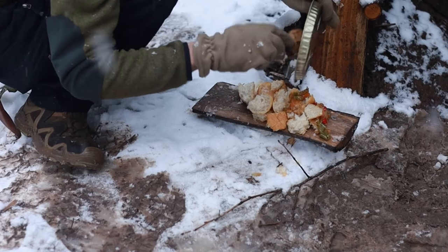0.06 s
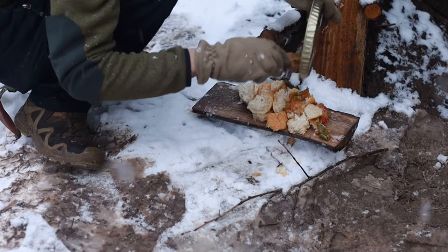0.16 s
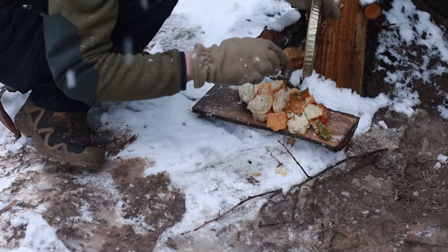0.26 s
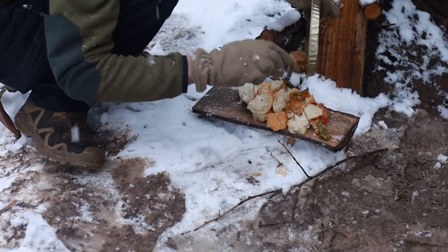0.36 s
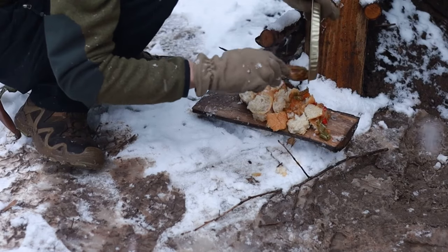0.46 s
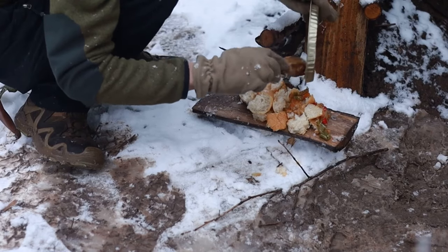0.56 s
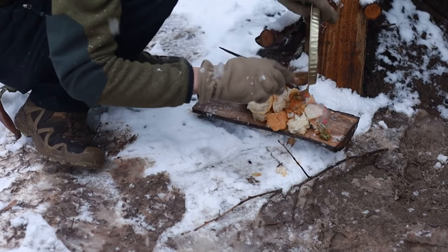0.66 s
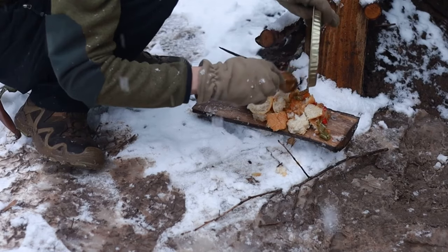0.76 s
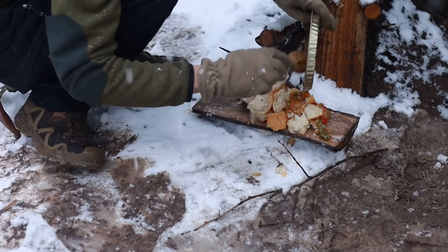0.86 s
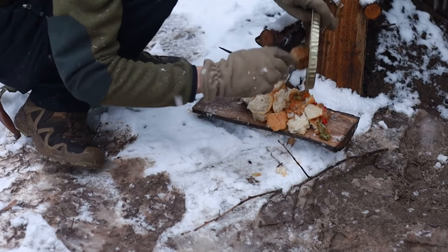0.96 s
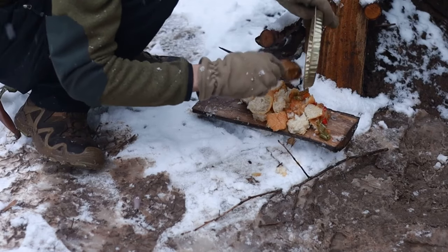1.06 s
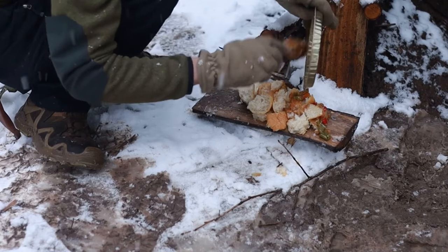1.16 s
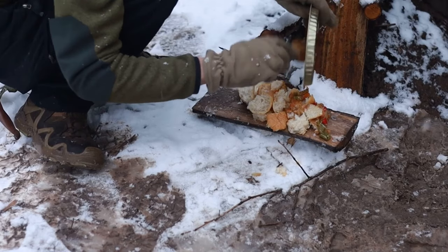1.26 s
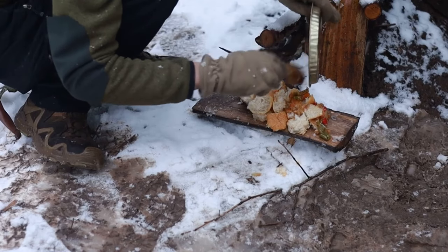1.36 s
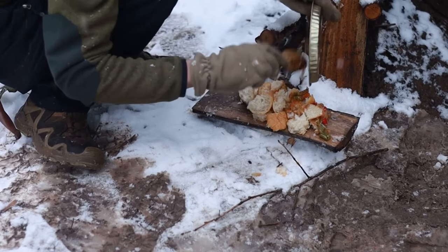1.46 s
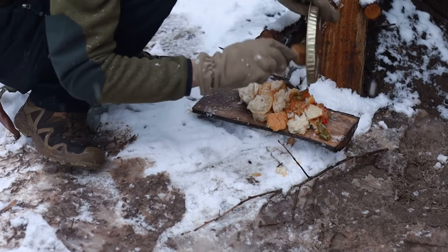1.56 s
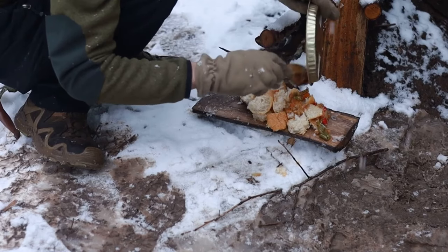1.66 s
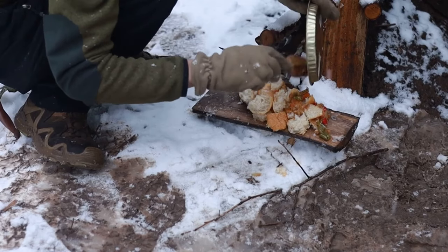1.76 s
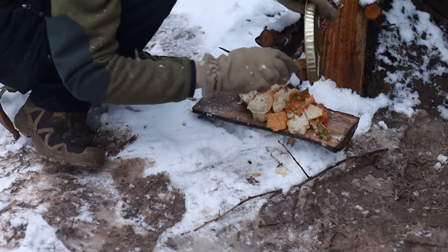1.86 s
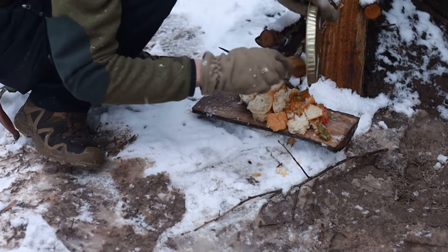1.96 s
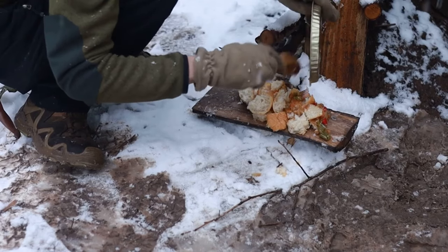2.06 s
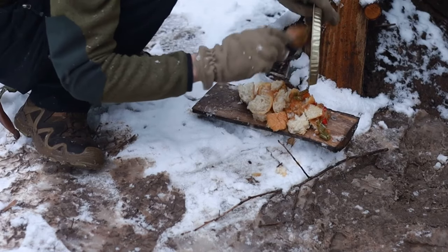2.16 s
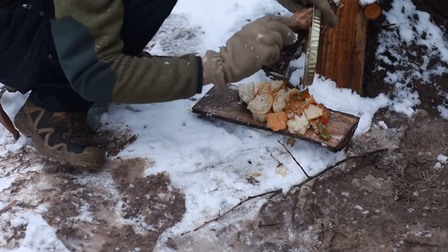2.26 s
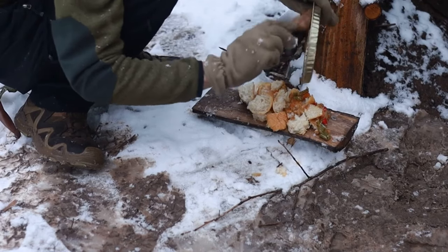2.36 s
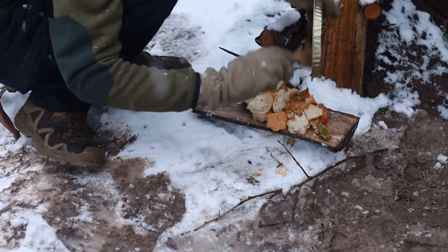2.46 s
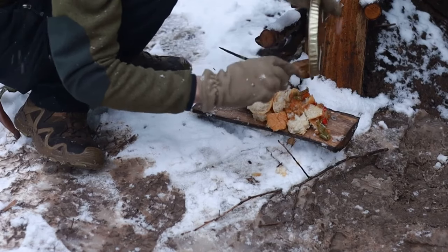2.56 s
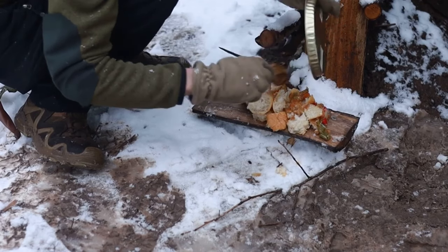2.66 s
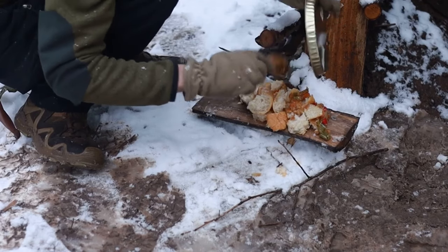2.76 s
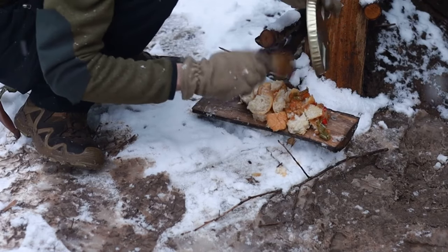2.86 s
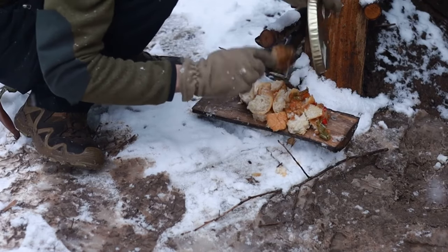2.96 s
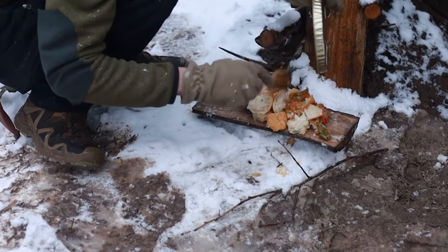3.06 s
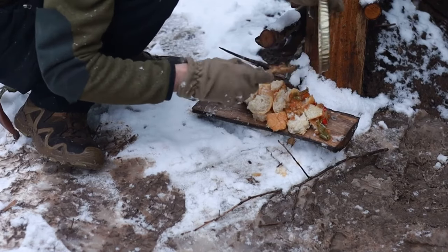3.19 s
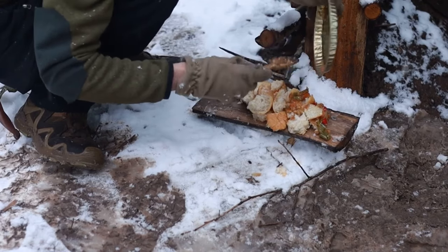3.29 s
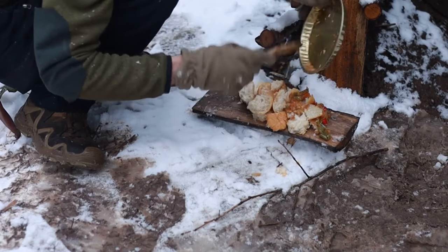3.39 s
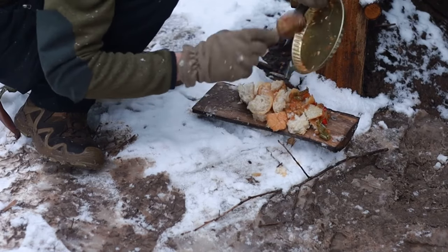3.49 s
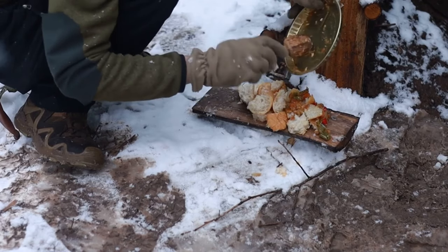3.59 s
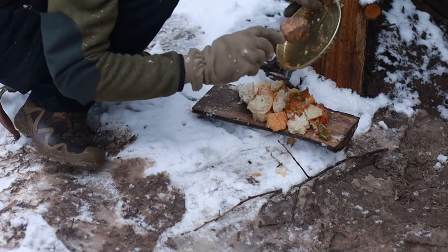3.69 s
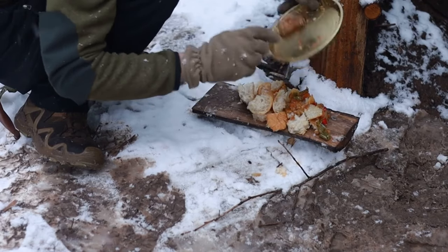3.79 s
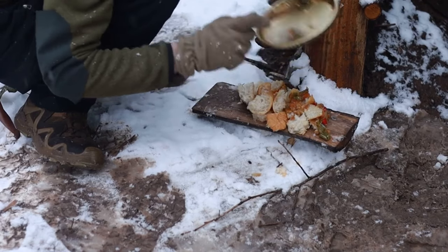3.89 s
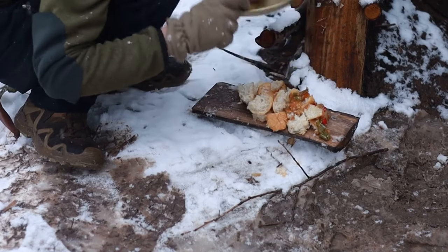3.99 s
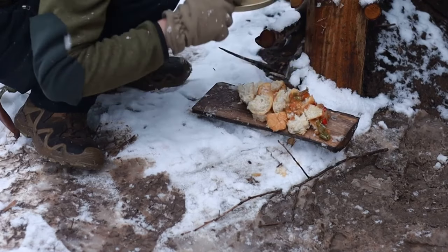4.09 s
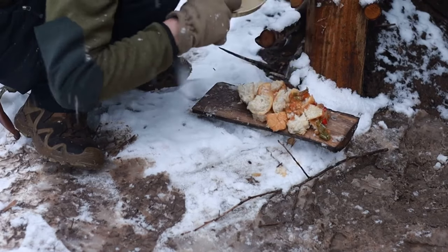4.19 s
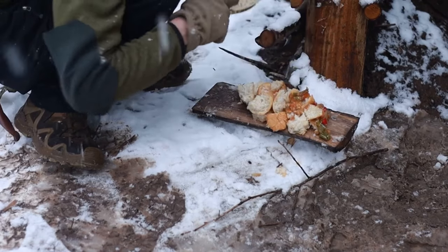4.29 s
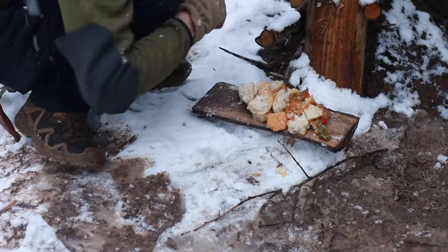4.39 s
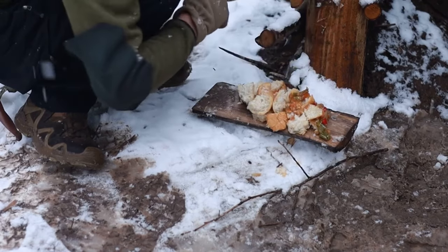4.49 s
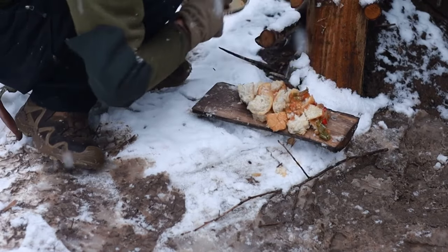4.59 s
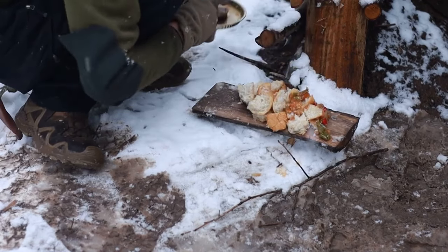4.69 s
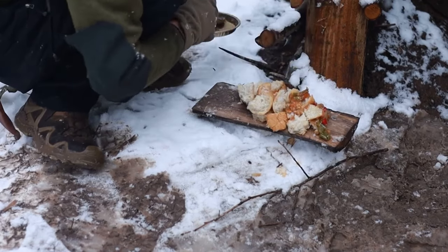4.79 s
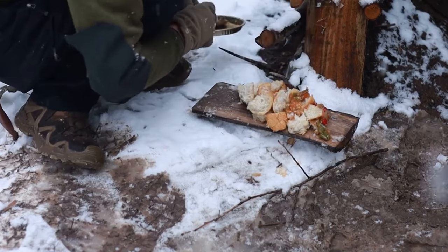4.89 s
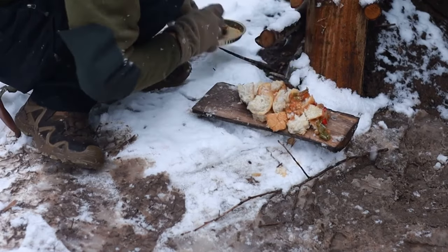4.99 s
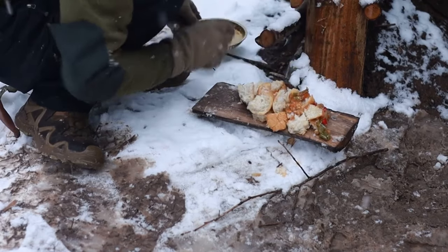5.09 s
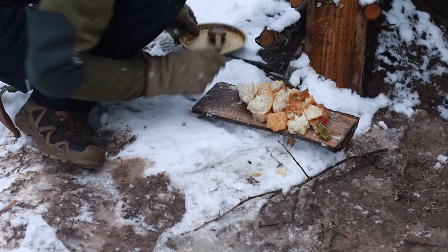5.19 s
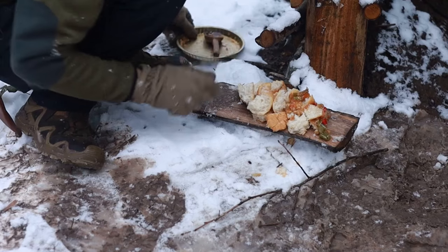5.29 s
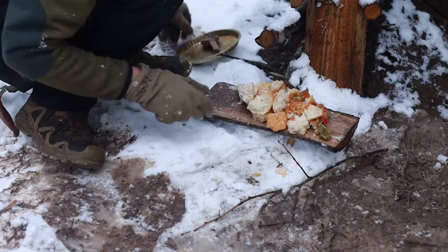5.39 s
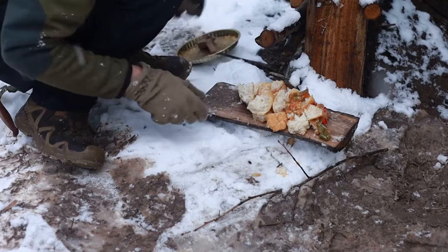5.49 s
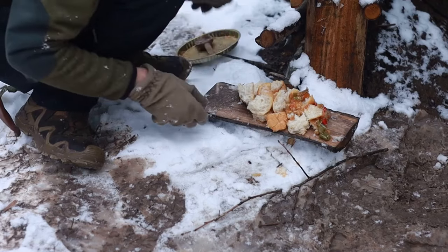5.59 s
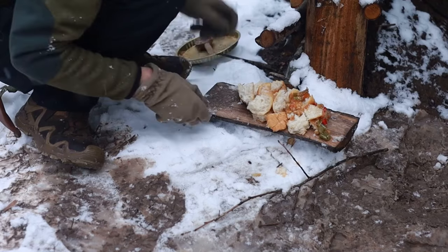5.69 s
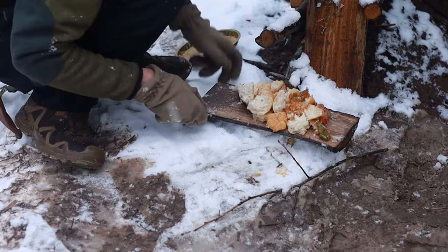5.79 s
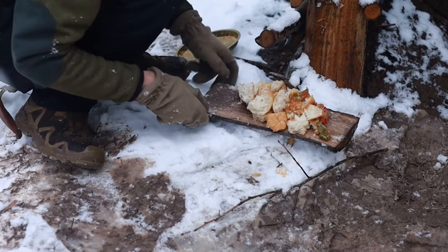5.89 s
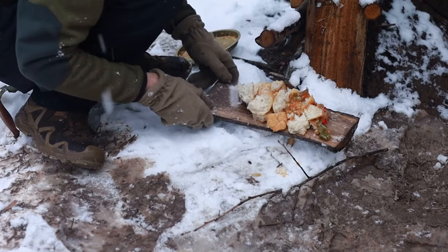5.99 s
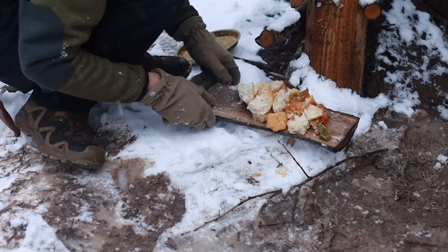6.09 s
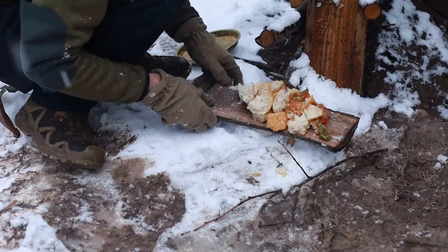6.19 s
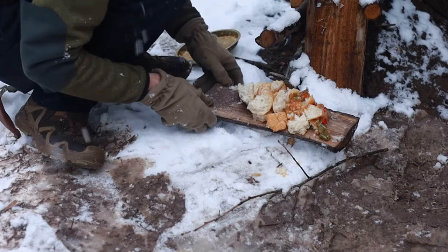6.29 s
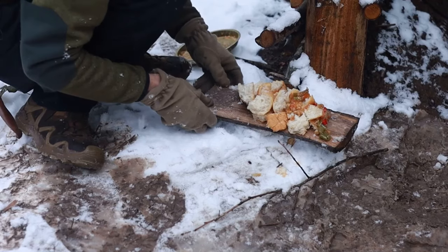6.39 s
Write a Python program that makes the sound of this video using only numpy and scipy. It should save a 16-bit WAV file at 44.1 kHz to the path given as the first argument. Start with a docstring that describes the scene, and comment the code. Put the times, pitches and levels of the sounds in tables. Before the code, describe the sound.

A very quiet outdoor place, close stereo microphone, no echo, only a faint steady hush of air. From 0.3 s a knife taps a thin metal plate slightly right of centre: short, dry clinks with brief ringing, at uneven gaps. Between 1.0 and 2.1 s taps mix with gritty little scrapes, stronger near 1.15, 1.45 and 1.7 s, with tiny squeaks at 1.16 and 1.72 s. A soft sleeve swish passes at 2.3 s, then light ticks and a faint scrape at 2.6-2.75 s and a muted touch at 3.1 s. At 3.73 s comes by far the loudest event, a hard hollow clank with a wooden knock, bouncing more softly at 3.88 s with a short squeak. Small clinks follow at 4.15 and 4.8 s, with fleece rustles from 4.0 to 5.4 s, and faint dull bumps at 4.6, 5.7 and 6.4 s.

```python
"""Knife scraping a metal plate outdoors

A knife taps and scrapes food scraps off a gloved, hand-held plate in still, snowy air; later it clatters and
bounces. Each contact is a short slip driving decaying plate modes, shared among five registers; a few contacts
squeak. Blunt knocks, mostly wood, are short sines with noise puffs; sleeves and the faint hush are coloured
stereo noise."""
import sys
import numpy as np
from scipy import signal
from scipy.fft import rfft, irfft, next_fast_len
from scipy.io import wavfile
from scipy.ndimage import uniform_filter1d, map_coordinates

SR = 44100
rng = np.random.default_rng(int(sys.argv[2]) if len(sys.argv) > 2 else 0)


def wav_out(sig):
    """Save sig, one row per channel (or a flat mono array), as 16-bit PCM at SR to the path in sys.argv[1]."""
    wavfile.write(sys.argv[1], SR, np.round(np.clip(np.atleast_2d(sig).T, -1, 1) * 32767).astype(np.int16))


N = 284445

# knife on plate, and at 2.584 s a soft, low scrape of food falling onto it: t/s, slip/s, nominal strength/dB,
# hardness/dB (about 0 bare steel, below -10 cushioned by food), favoured f/Hz at the contact point, place (0
# near the rim, 1 middle)
CONTACTS = [(.3048, .003, -44.5, -1, 1000, 0.2), (.3946, 0.0033, -59, -12, 685, 0),
            (.543, 0.0017, -50, 2.5, 1050, 0.18), (.61, .0057, -61.5, -2, 1140, 0),
            (.7637, 0.0087, -64.5, -6, 1700, 0.056), (.8092, 0.0033, -49, 1.5, 2220, 0.036),
            (1.0393, 0.028, -61, -7, 392, 0.51), (1.1578, 0.0015, -44, 5, 2220, 0.27),
            (1.382, .017, -57, -7, 704, 0.41), (1.4645, 0.0063, -42, -5.5, 776, 0.12),
            (1.7095, 0.0017, -56.5, -18, 350, 0.64), (1.716, .0064, -53, 0, 2370, 0),
            (1.727, 0.021, -44, -22, 1710, 0.4), (1.775, 0.0019, -45.5, 1, 2250, 0),
            (1.9732, 0.014, -56, -4.5, 523, 0.25), (2.038, 0.03, -60, -1.5, 2420, 0.032),
            (2.0677, 0.026, -61, 0, 2460, 0), (2.584, 0.029, -67.5, -3, 220, 0.65),
            (2.671, .002, -47.5, -2, 2470, .1), (2.6815, 0.0012, -53.5, -4, 930, 0.47),
            (2.7385, .003, -62, -5.5, 1020, 0), (2.7495, .003, -66, -3, 1100, .2),
            (3.075, .0017, -62, -12, 620, 0.097), (3.7301, 0.0059, -32.5, -2.5, 1100, 1),
            (3.7379, 0.012, -32, -1.5, 1860, 0.15), (3.877, 0.0066, -44, 2.5, 970, 1),
            (3.8845, 0.0029, -43.5, -6.5, 940, 0.64), (4.1413, 0.0025, -51.5, -12.5, 1360, 0.39),
            (4.227, 0.014, -64, -22, 540, 0.47), (4.7998, 0.00029, -44.5, -4.5, 1970, 0),
            (5.566, 0.0037, -79.5, 16, 5800, 0)]
# edge sticking and slipping on one plate mode: t/s, length/s, level/dB
SQUEAKS = [(1.164, 0.01, -36), (1.722, 0.011, -35.5), (3.895, 0.024, -37)]
# clear plate modes: f/Hz, relative level struck near the rim/dB, in the middle/dB, t60/s
PLATE_MODES = [(179.3, -3.5, -7.5, 0.17), (456.5, -8, -11.5, 0.28), (548, -21, -8, 0.32),
               (650, -18.5, -5, 0.3), (779.6, 3.5, -7, 0.065), (855, -9.5, -5.5, .22), (949, -9, 2, 0.077),
               (1085, -9, -4.5, 0.17), (1128, 0.5, -4, 0.07), (1360, -24, -15, 0.22),
               (1574, -20, -19, 0.13), (1690, -3.5, 6.5, 0.14), (2080, -6.5, -1, 0.11),
               (2285, 2, -4, 0.069), (2324, -3, -15, 0.14), (2401, 3.5, -3, 0.063), (2520, -7.5, -5, 0.039),
               (2670, 4.5, -15, 0.049), (3380, -29, -4, 0.15), (3570, 11.5, -7, 0.023),
               (4750, -4, -10, 0.055), (4970, -18, 6, 0.082), (5870, -28, 3, 0.081), (7020, 3, -3, 0.05),
               (6800, -14, -14, 0.076)]
# weak, overlapping plate modes: f/Hz, t60/s
CROWD_T60 = [(200, 0.29), (900, 0.2), (2200, 0.16), (4000, 0.1), (7000, .11), (14000, 0.094)]
# plate radiation: f/Hz, gain/dB
RADIATION = [(40, -19), (130, -26), (200, 4.5), (320, -1), (500, -2.5), (1050, 9.5), (1950, 7), (2550, 8),
             (2950, -0.5), (3650, 2), (4700, -1), (6300, -0.5), (8500, -9), (16000, -19)]
# difference between the two microphones on the plate: f/Hz, side gain/dB
PLATE_WIDTH = [(100, -19), (380, -17), (700, -15), (1300, -10.5), (2400, -10), (4400, -7), (8000, -15.5),
               (15000, -15)]
# contact registers thud, body, ring, crack, tick: low f/Hz, high f/Hz
REGISTERS = [(30, 620), (620, 1400), (1400, 2900), (2900, 8500), (8500, 18000)]
# firm tap of bare steel near the rim: level relative to FIRM_DB/dB, one per register
FIRM_TAP_DB = [-10, -0.85, .7, -0.5, -14]
# growth with strength, least in the thud: dB per dB, one per register
FORCE_GROWTH = [0.39, 0.89, 1.14, 1.19, 0.91]
# growth with hardness, mainly in the treble: dB per dB, one per register
HARDNESS_GROWTH = [0, 0.11, 0, 0.75, 1.4]
# change from rim to middle, where the plate booms: level/dB, one per register
MIDDLE_DB = [8, 5.5, -5, -1, 1.5]
# blunt low knocks and thumps, mostly of the wooden handle and the board, one perhaps a knee or boot in the
# snow: t/s, level before the high-pass/dB, f/Hz
KNOCKS = [(0.3964, -36, 282), (2.865, -48.5, 317), (3.495, -41, 497), (3.7298, -14.5, 516),
          (3.8778, -26, 457), (3.882, -24, 533), (4.06, -50, 350), (4.635, -47.5, 340),
          (5.6723, -44.5, 570), (6.372, -51, 190)]
# arm movements rubbing sleeves and gloves: t at the height/s, half length/s, level/dB
SWISHES = [(2.334, 0.18, -69.5), (3.096, .1, -68), (3.547, 0.019, -58.5), (4.06, 0.037, -58),
           (4.598, 0.054, -57), (4.873, 0.045, -62), (5.284, 0.13, -57)]
# cloth colour: f/Hz, relative density/dB per Hz
CLOTH = [(150, -15), (500, 1.5), (1500, 9.5), (2600, 4), (4500, -4), (7500, -4.5), (16000, -20.5)]
# still-air colour: f/Hz, relative density/dB per Hz
HUSH = [(12, -24), (22, -44), (45, -8.5), (85, -0.5), (130, 0.5), (200, -3), (300, -8), (450, -14),
        (700, -14), (1100, -12), (1700, -9.5), (2500, -13), (5500, -21.5), (16000, -31.5)]
# width of air and cloth: f/Hz, side gain/dB
HUSH_WIDTH = [(60, -16), (130, -20), (300, -8), (1400, -7.5), (3500, 2), (5500, 4), (8000, -19),
              (15000, -50)]

FIRM_DB = -45  # strength of an ordinary firm tap
THUD_LIMIT_DB = 6.5  # most the thud exceeds the strength: light touches hardly push the plate
BLOW_S = 0.05  # span over which a contact's level is counted
SQUEAK_HZ = 1666
STIR_DB = -64  # the clothes never keep quite still
CEILING, TOP_HZ = 0.3, 16100  # recorder: peak amplitude, band limit


def contacts(modes_db, crowd_db, stiff_hz):
    """Each contact rings the plate anew; strength, hardness and place share it among the registers."""
    size = 16384
    t, hz = np.arange(size) / SR, np.fft.rfftfreq(size, 1 / SR)
    bands = [signal.butter(4, edges, "band", fs=SR, output="sos") for edges in REGISTERS]
    mid_side = np.array([np.ones_like(hz), causal(along(PLATE_WIDTH, hz))])
    colour = causal(along(RADIATION, hz)) * mid_side
    stiff = (1j * hz / (1j * hz + stiff_hz)) ** 2  # a small plate has few modes in the bass
    out = np.zeros((2, N))
    for s, slip_s, strength_db, hardness_db, spot_hz, place in CONTACTS:
        blur = clack(t, snap_db=6, snap_t60_s=0.02, rattle_t60_s=0.02) + amp(crowd_db) * plate_crowd(t)
        force = blade_force(t, slip_s, drag=23.6, grit_db=6)
        answer = stiff * rfft(blur) * rfft(force)
        modes = plate_modes(t, place, slip_s, scatter_db=2.5)
        answer = answer + amp(modes_db) * rfft(modes)
        # modes that move most under the blade
        spot = 1 + 1.15 / (1 + 4j * (hz / spot_hz - spot_hz / (hz + 1)))
        sound = irfft(answer * colour * spot)
        levels_db = register_levels(strength_db, hardness_db, place)
        for band, db in zip(bands, levels_db):
            part = signal.sosfilt(band, sound)
            add(out, s, amp(db) * part * np.sqrt(BLOW_S * SR) / np.linalg.norm(part[0]))
    return left_right(out)


def blade_force(t, slip_s, drag, grit_db):
    """A sharp touch, then the edge slips on in uneven catches; long slips are mostly friction."""
    knots_s = np.arange(200) / 350
    catches = amp(grit_db * np.interp(t, knots_s, rng.standard_normal(200)))
    friction = rng.standard_normal(len(t)) ** 3 * catches * np.exp(-(t / slip_s) ** 2)
    touch = t == 0
    return evened(touch + drag * np.sqrt(slip_s) * friction / np.linalg.norm(friction), bins=160)


def clack(t, snap_db, snap_t60_s, rattle_t60_s):
    """First instant, mid and side: a snap, then bending waves crossing the plate."""
    fade = amp(snap_db - 60 * t / snap_t60_s) + amp(-60 * t / rattle_t60_s)
    return np.array([evened(fade * noise, bins=200) for noise in rng.standard_normal((2, len(t)))])


def plate_crowd(t):
    """Blur of weak, overlapping modes, mid and side; mid energy 1."""
    f, age_s, cells = signal.stft(rng.standard_normal((2, len(t))), SR, nperseg=256)
    t60_s = along(CROWD_T60, f)[:, None]
    crowd = signal.istft(cells * amp(-60 * age_s / t60_s), SR, nperseg=256)[1][:, :len(t)]
    return crowd / np.linalg.norm(crowd[0])


def plate_modes(t, place, slip_s, scatter_db):
    """Clear modes, mid and side, mid energy 1; place weights them, and they build while the edge slips."""
    hz, rim_db, middle_db, t60_s = np.transpose(PLATE_MODES)[:, :, None]
    place = np.clip(place, 0, 1)
    # short waves depend most on the exact spot
    chance_db = scatter_db * np.sqrt(hz / hz.mean()) * rng.standard_normal(hz.shape)
    db = (1 - place) * rim_db + place * middle_db + chance_db
    ringing = amp(db - 60 * t / t60_s) * np.exp(2j * np.pi * hz * t)
    phase = np.exp(2j * np.pi * rng.random((2, len(PLATE_MODES))))
    build = 1 - np.exp(-2 * t / slip_s)
    modes = (phase @ ringing).real * build
    return modes / np.linalg.norm(modes[0])


def register_levels(strength_db, hardness_db, place):
    """Register levels/dB: a stronger, harder contact is brighter, one nearer the middle deeper."""
    force_db = (strength_db - FIRM_DB) * np.array(FORCE_GROWTH)
    edge_db = hardness_db * np.array(HARDNESS_GROWTH)
    place_db = np.clip(place, 0, 1) * np.array(MIDDLE_DB)
    db = FIRM_DB + np.array(FIRM_TAP_DB) + force_db + edge_db + place_db
    db[0] = min(db[0], strength_db + THUD_LIMIT_DB)
    return db


def squeaks(waver, release_t60_s):
    """The dragged edge feeds one mode for a moment, then lets it die."""
    t = np.arange(SR // 5) / SR
    out = np.zeros(N)
    for s, length_s, db in SQUEAKS:
        hz = SQUEAK_HZ * (1 + waver * wobble(226)[:len(t)])
        phase = 2 * np.pi * np.cumsum(hz) / SR
        attack = np.minimum(2 * t / length_s, 1)
        release = amp(-60 * np.maximum(t - length_s, 0) / release_t60_s)
        add(out, s, amp(db) * attack * release * np.sin(phase))
    return out


def knocks(tone_t60_s, puff_gain, puff_t60_s, low_hz):
    """A blunt knock gives a few cycles and a dull puff, with no ring."""
    t = np.arange(SR // 8) / SR
    out = np.zeros(N)
    for s, db, hz in KNOCKS:
        band = signal.butter(2, [hz / 2, 4 * hz], "band", fs=SR, output="sos")
        noise = unit_rms(signal.sosfilt(band, rng.standard_normal(len(t))))
        tone = np.sin(2 * np.pi * hz * t) * amp(-60 * t / tone_t60_s)
        puff = puff_gain * noise * amp(-60 * t / puff_t60_s)
        add(out, s, amp(db) * (tone + puff))
    # small pieces radiate no deep bass
    return signal.sosfilt(signal.butter(3, low_hz, "high", fs=SR, output="sos"), out)


def sleeves(grain_db, flutter_db):
    """Fleece rubbing on itself: a soft, grainy swish that swells and fades with each arm movement."""
    t = np.arange(N) / SR
    swells = sum(amp(db) ** 2 * np.exp(-((t - s) / half_s) ** 2) for s, half_s, db in SWISHES)
    power = amp(STIR_DB) ** 2 + swells
    grain = unit_rms(amp(flutter_db * wobble(18) + grain_db * wobble(900)))
    return np.sqrt(power) * grain * rush(CLOTH, HUSH_WIDTH)


def air():
    """Hush of the open air: coloured noise, barely wavering."""
    return amp(-60.5 + 0.25 * wobble(3.09)) * rush(HUSH, HUSH_WIDTH)


def rush(spectrum, width):
    """Stereo noise of rms 1 with a given colour and width."""
    def response(hz):
        return amp(along(spectrum, hz)) * np.array([np.ones_like(hz), amp(along(width, hz))])
    pair = filtered(rng.standard_normal((2, N)), response)
    return unit_rms(left_right(pair))


def evened(x, bins):
    """Burst of energy 1 whose broad spectrum is made level, as that of a hard blow is."""
    power = np.abs(rfft(x)) ** 2
    smooth = np.abs(uniform_filter1d(power, bins)) + 1e-6 * power.mean()
    burst = irfft(rfft(x) * causal(-10 * np.log10(smooth)))
    return burst / np.linalg.norm(burst)


def causal(db):
    """Minimum-phase response with these gains: never sounds before its cause."""
    cepstrum = irfft(np.log(amp(db)))
    half = len(cepstrum) // 2
    cepstrum[1:half] *= 2
    cepstrum[half + 1:] = 0
    return np.exp(rfft(cepstrum))


def filtered(x, response):
    """x through a response given as a function of f/Hz."""
    n = x.shape[-1]
    m = next_fast_len(n + 4096)
    return irfft(rfft(x, m) * response(np.fft.rfftfreq(m, 1 / SR)), m)[..., :n]


def wobble(rate_hz):
    """Smooth random curve, rate_hz knots a second."""
    knots = rng.standard_normal(int(N * rate_hz / SR) + 4)
    return map_coordinates(knots, [np.arange(N) * rate_hz / SR])


def along(points, hz):
    """(f/Hz, value) points read on a log frequency axis."""
    f, v = np.transpose(points)
    return np.interp(np.log(hz + 1), np.log(f + 1), v)


def amp(db):
    """Decibels to gain."""
    return 10 ** (np.asarray(db) / 20)


def unit_rms(x):
    """Scaled to rms 1."""
    return x / np.sqrt(np.mean(x ** 2) + 1e-20)


def add(track, s, sound):
    """Mix a sound into the track at s seconds."""
    start = max(round(s * SR), 0)
    part = track[..., start:start + sound.shape[-1]]
    part += sound[..., :part.shape[-1]]


def left_right(pair):
    """Mid and side to left and right."""
    return np.array([pair[0] + pair[1], pair[0] - pair[1]])


def scene():
    """Plate slightly to the right, knocks in the centre, sleeves and air in stereo."""
    plate = contacts(modes_db=-9.5, crowd_db=-7.0, stiff_hz=222) + squeaks(waver=0.019, release_t60_s=0.057)
    thumps = knocks(tone_t60_s=0.016, puff_gain=0.28, puff_t60_s=0.078, low_hz=184)
    pan = amp([[-0.7], [0.6]])  # left, right
    return plate * pan + thumps + sleeves(grain_db=3.5, flutter_db=3.0) + air()


def record(dry):
    """The recorder rounds off the tallest peaks and cuts steeply above its band limit."""
    rounded = dry / (1 + (dry / CEILING) ** 6) ** (1 / 6)
    return filtered(rounded, lambda hz: 1 / np.sqrt(1 + (hz / TOP_HZ) ** 120))


dry = scene()
out = record(dry)
wav_out(out)
```